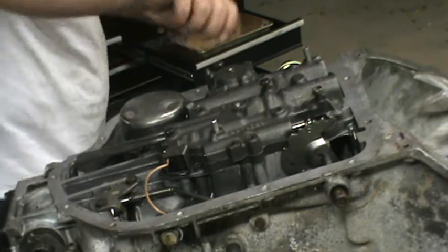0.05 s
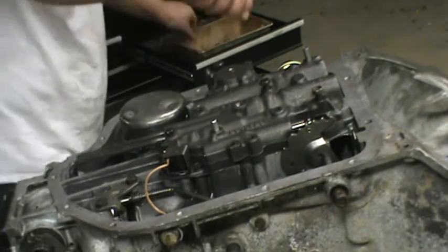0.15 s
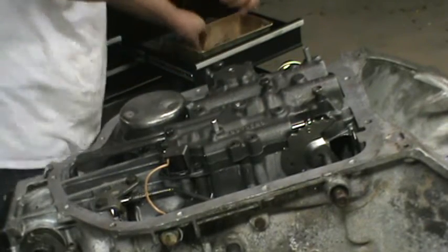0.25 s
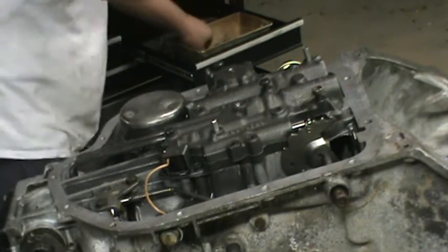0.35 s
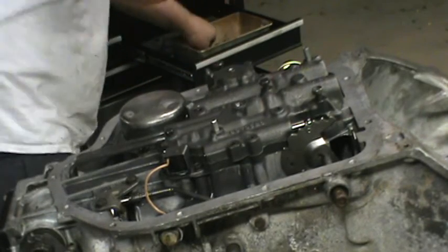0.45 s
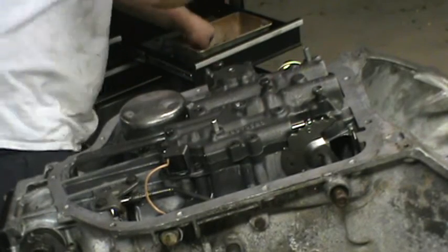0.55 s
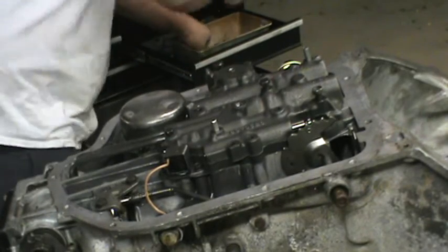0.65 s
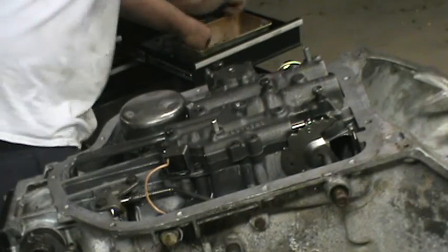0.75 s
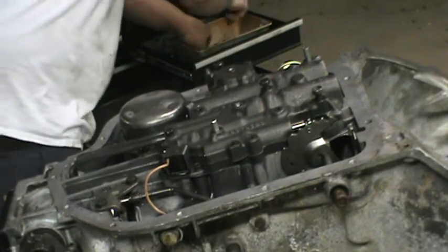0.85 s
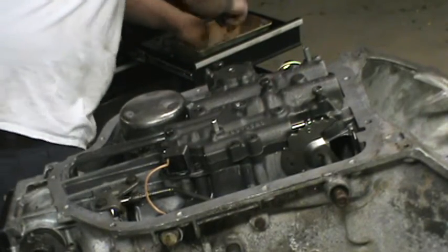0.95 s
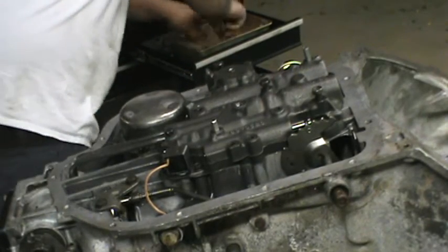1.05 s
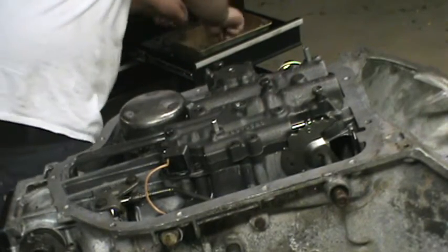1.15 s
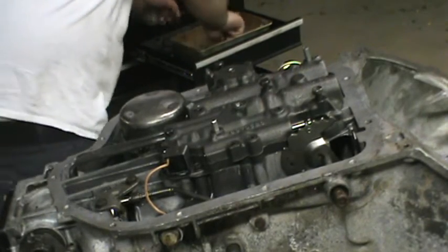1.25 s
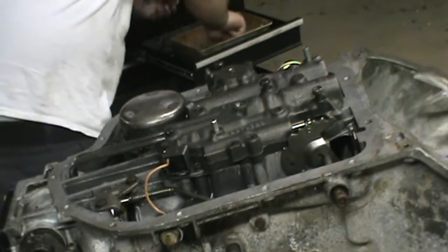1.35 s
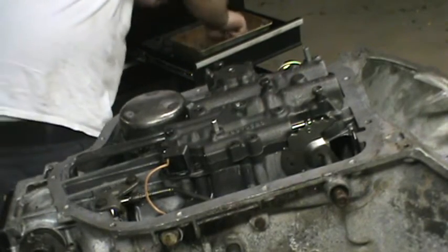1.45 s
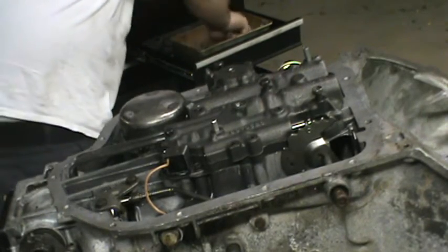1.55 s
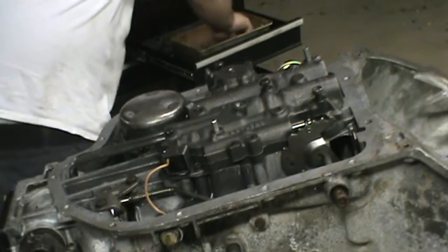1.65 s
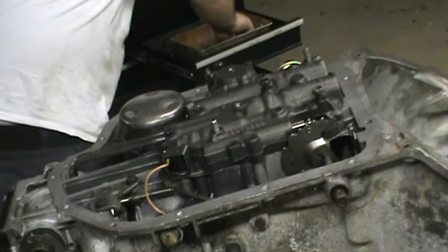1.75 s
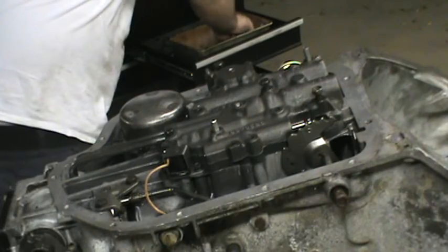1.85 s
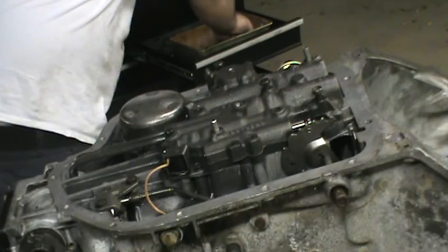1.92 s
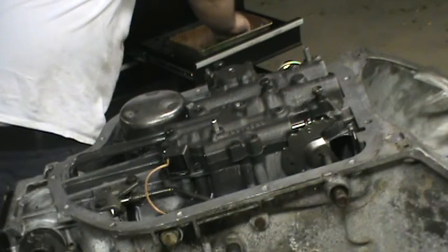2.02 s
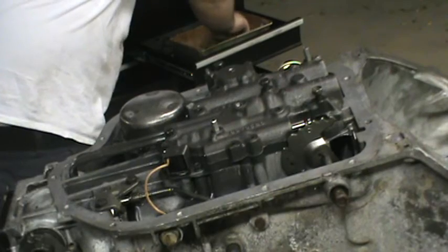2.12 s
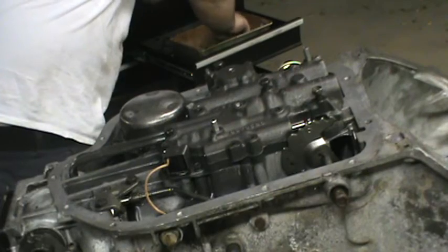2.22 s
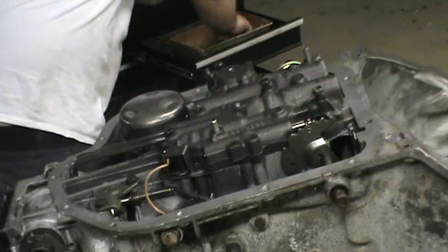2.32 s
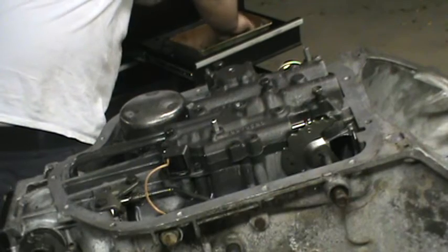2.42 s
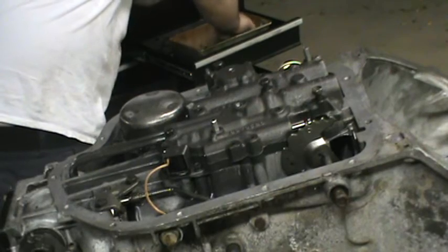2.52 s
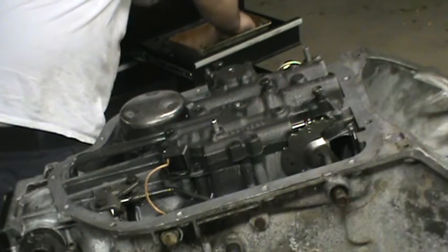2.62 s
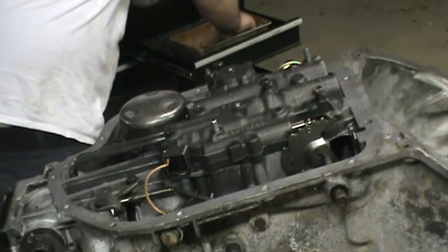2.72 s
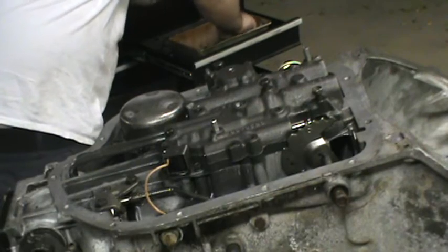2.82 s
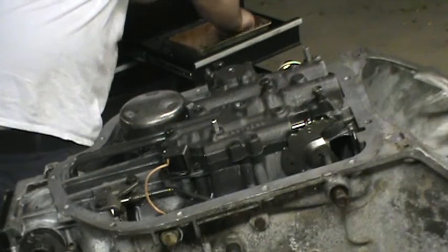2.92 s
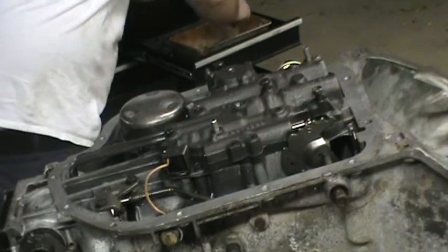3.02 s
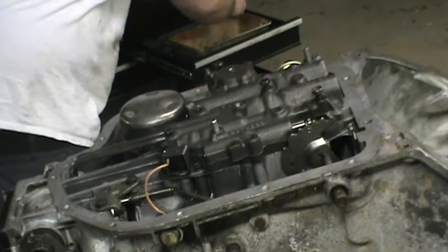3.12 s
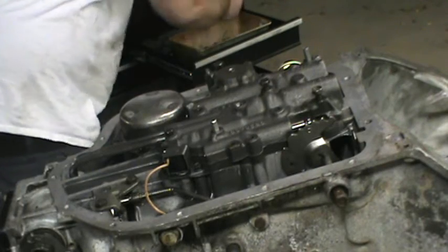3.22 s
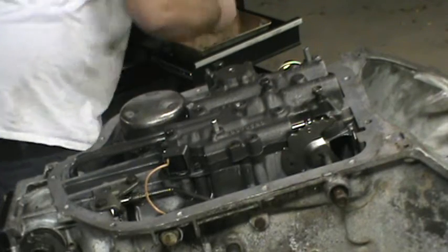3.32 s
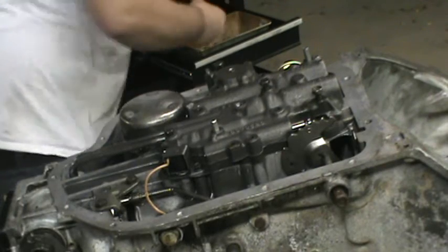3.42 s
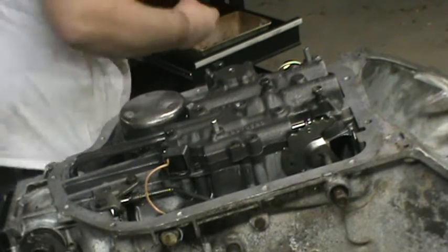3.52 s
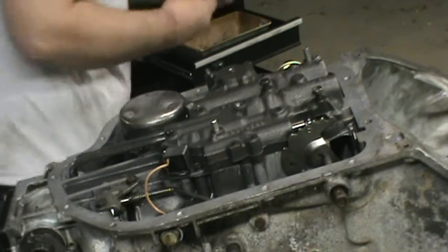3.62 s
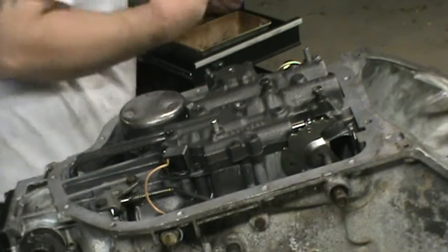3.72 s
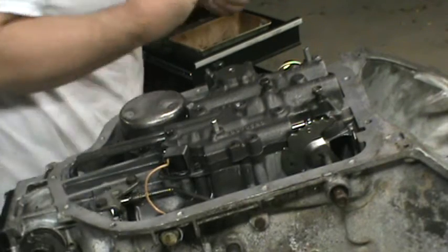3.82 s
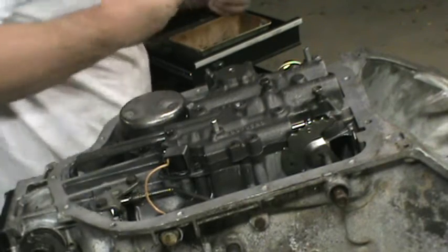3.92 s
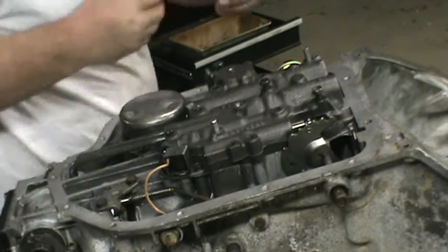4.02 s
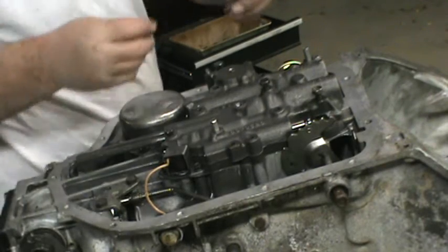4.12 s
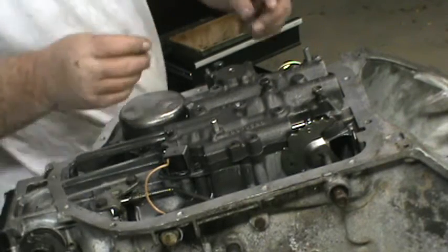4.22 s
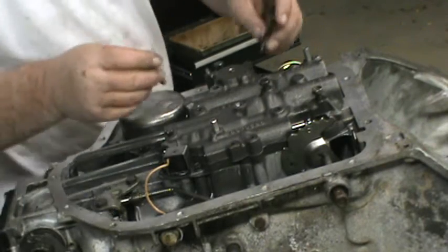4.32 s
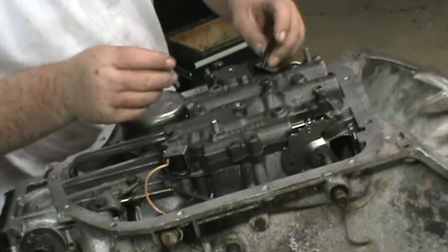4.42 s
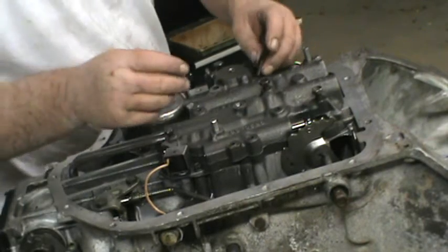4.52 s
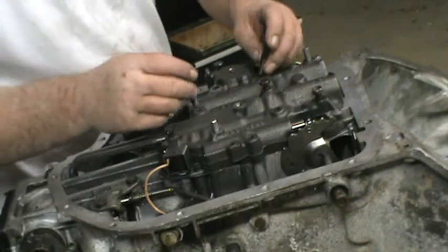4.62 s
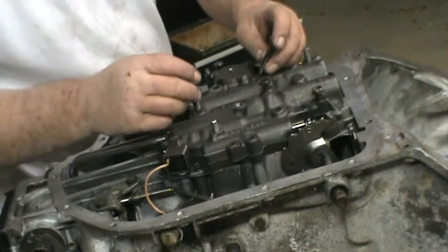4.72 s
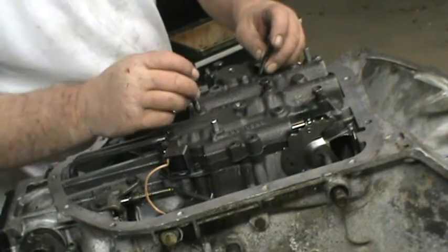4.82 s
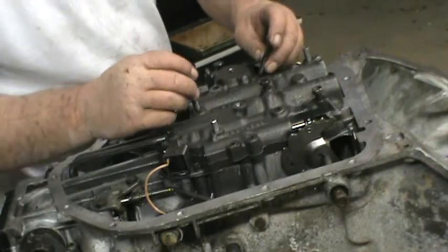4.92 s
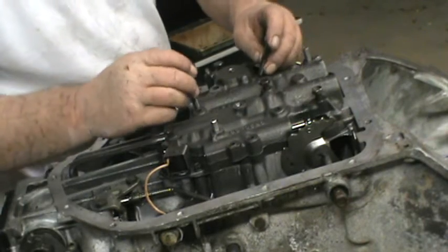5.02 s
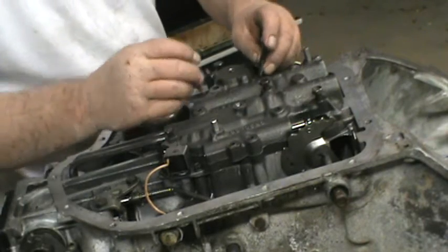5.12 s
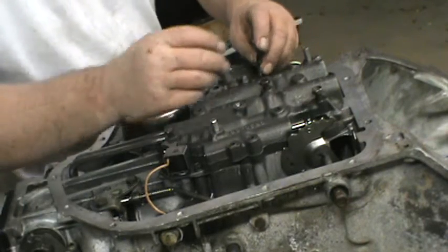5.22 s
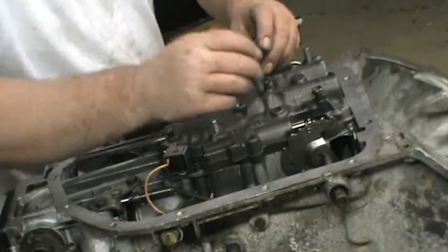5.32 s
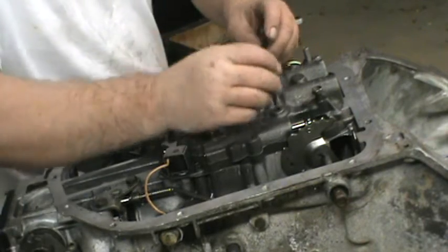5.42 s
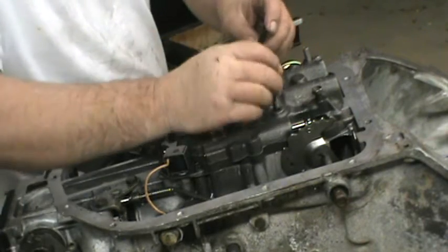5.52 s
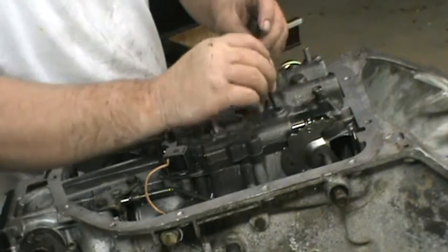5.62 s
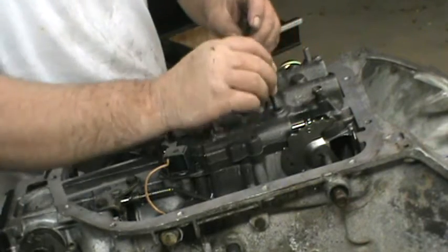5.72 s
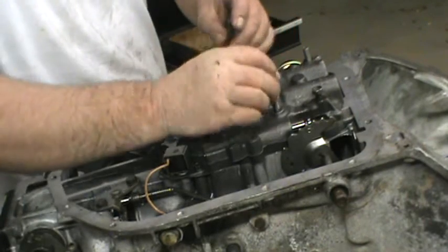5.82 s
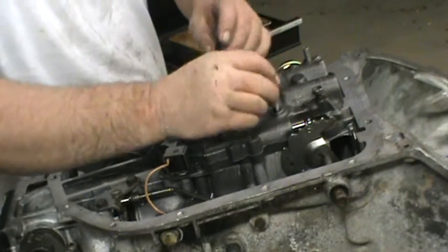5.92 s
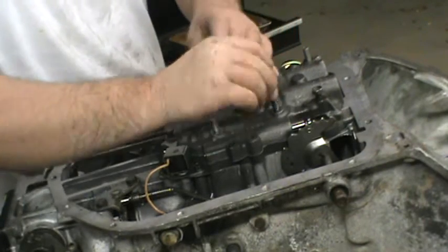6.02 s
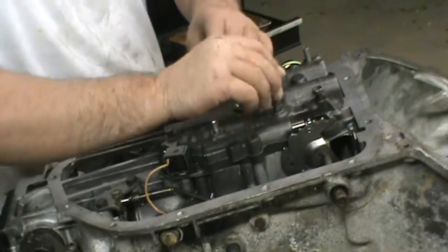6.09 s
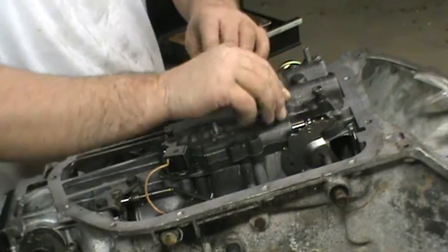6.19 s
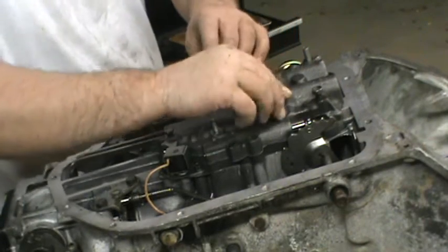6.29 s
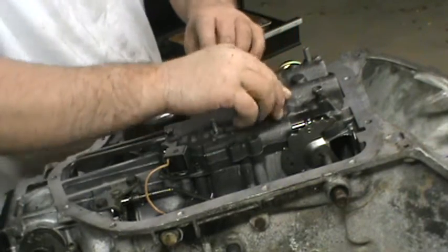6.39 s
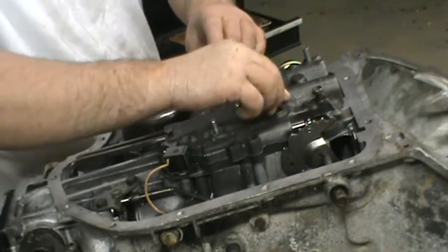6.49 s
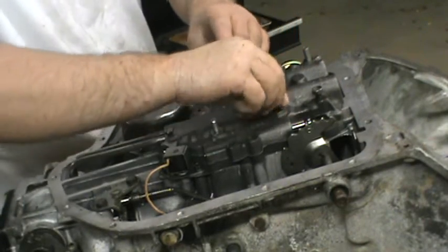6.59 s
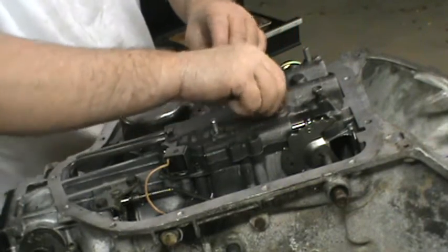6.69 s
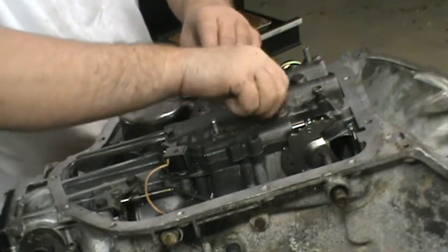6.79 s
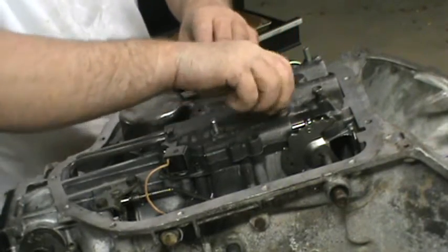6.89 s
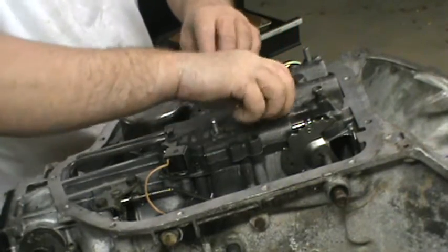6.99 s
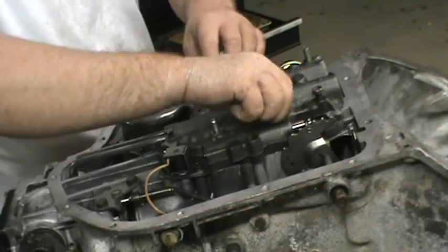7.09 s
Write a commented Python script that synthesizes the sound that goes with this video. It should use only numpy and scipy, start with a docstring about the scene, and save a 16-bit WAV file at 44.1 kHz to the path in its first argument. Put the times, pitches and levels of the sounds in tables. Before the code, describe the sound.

A quiet workshop heard through a small camera microphone, with soft hiss, low room rumble and a very faint high whine. From about 0.3 to 2.8 seconds, steel bolts are rummaged in a shallow metal tray: short gritty slides, hollow knocks and high glassy clinks, with a bright clink at 0.8 and harder blows near 1.4, 2.2 and 2.45. Around 3 seconds it falls nearly silent. Near 3.5 a cart shifts with a dull grumble, faint scuff and low panel hum; a clearer gritty shoe scrape comes at 4.2. Closer, tiny taps and faint thread ticks follow from 4.5 to 5.3, a click at 5.5, a sharp clink at 5.85, then a dense, bright clatter with a short scrape on the casting from 6.05 to 6.3. Smaller rattles follow at 6.7 to 6.9 and just after 7.0, with sparse short echoes.

```python
"""Steel bolts rummaged by hand in a shallow tray on a sheet-metal cart: slips and blows ring damped modes.
Shoes scuff gritty concrete as coloured noise grains, and a cart panel hums as a sine.
Bolts are then dropped into the holes of a cast machine part and turned by hand, nearer than the tray.
The place is a quiet workshop with sparse echoes; the small camera microphone adds hiss and a thin whine."""
import sys
import numpy as np
from scipy import signal
from scipy.fft import rfft, irfft
from scipy.io import wavfile
from scipy.ndimage import uniform_filter1d

SR = 44100
rng = np.random.default_rng(int(sys.argv[2]) if len(sys.argv) > 2 else 0)


def to_wav(sig):
    """Store sig (one row per channel, or 1-D mono) as 16-bit WAV at the path in sys.argv[1].

    Samples outside -1..1 are clipped; the rate is SR.
    """
    pcm = np.clip(np.atleast_2d(sig), -1, 1) * 32767
    pcm = np.round(pcm).astype(np.int16)
    wavfile.write(sys.argv[1], SR, pcm.T)  # frames by channels


N = 315315


def gain_of(db):
    """Decibels to amplitude."""
    return 10 ** (np.asarray(db) / 20)


def evened(x):
    """Scales to rms 1."""
    return x / np.sqrt(np.mean(x ** 2) + 1e-20)


def read(points, hz, axis=1):
    """Reads one column of a table on a log-frequency axis."""
    points = np.array(points)
    return np.interp(np.log(hz + 1), np.log(points[:, 0] + 1), points[:, axis])


def add(mix, s, sound):
    """Mixes a sound in at time s."""
    part = mix[round(s * SR):][:len(sound)]
    part += sound[:len(part)]


def colour(x, points):
    """Gives x a spectrum, rms 1."""
    hz = np.fft.rfftfreq(len(x), 1 / SR)
    return evened(irfft(rfft(x) * gain_of(read(points, hz)), len(x)))


def grains(per_s, spread_db):
    """Random slips, a few of them large."""
    size_db = spread_db * np.minimum(rng.exponential(1, N), 4)
    size = gain_of(size_db) * rng.choice([-1., 1.], N)
    return size * (rng.random(N) < per_s / SR)


def swells(rows, rise_s, t60, axis=2):
    """Amplitude of a table of strokes: each rises 60 dB to its level, holds, and dies away by 60 dB."""
    out = np.zeros(N)
    for row in rows:
        start_s, held_s, level_db = row[0], row[1], row[axis]
        t = np.arange(-rise_s, held_s + t60, 1 / SR)
        away = np.maximum(np.maximum(-t / rise_s, (t - held_s) / t60), 0)
        add(out, max(start_s - rise_s, 0), gain_of(level_db - 60 * away))
    return out


def flutter(count, depth_db, size):
    """Loose contact makes a ring flutter once the blow has passed."""
    touch = evened(uniform_filter1d(rng.standard_normal(count), size=size))
    onset = np.minimum(np.arange(count) / 300, 1)
    return gain_of(depth_db * touch * onset)


def ring(modes, rise_s=0.000097, spot_hz=None, favour_db=0):
    """One blow on a body, peak 1; where it lands favours the modes near spot_hz."""
    t = np.arange(12000) / SR
    hz, db, t60 = np.transpose(modes)[:, :, None]
    luck = rng.standard_normal((len(modes), 2))
    if spot_hz:
        db = db + favour_db * np.exp(-(np.log2(hz / spot_hz) / 0.13) ** 2)
    vary_db, phase = 2.5 * luck[:, :1], 2 * luck[:, 1:]
    sound = gain_of(db + vary_db - 60 * t / t60) * np.sin(2 * np.pi * hz * t + phase)
    sound = sound.sum(0) * (1 - np.exp(-t / rise_s))
    return sound / abs(sound).max()


def rub(slips, modes, damp, wander_db, spot_hz=1, favour_db=0):
    """Slips excite a body under the hand; as the contact wanders, each mode comes and goes."""
    out = np.zeros(N)
    for hz, db, t60 in modes:
        wander = np.interp(np.arange(N), np.arange(0, N, 1500), rng.standard_normal(N // 1500 + 1))
        near_db = favour_db * np.exp(-(np.log2(hz / spot_hz) / 0.81) ** 2)
        level = gain_of(db + near_db + wander_db * wander)
        out += level * signal.oaconvolve(slips, ring([(hz, 0, t60 * damp)]))[:N]
    # hold the local loudness even, so that the strokes alone set the level
    return out / np.sqrt(uniform_filter1d(out ** 2, size=8000) + 1e-12)


# snap of hard metal contact: f/Hz, level/dB per Hz
CRACK_SPECTRUM = [(880, -20.5), (1500, -12.5), (2200, -18), (2870, -4), (3500, -9.5), (5900, -6),
                  (6510, -12.5), (8920, -8), (15800, -22)]


def crack(t60):
    """The broad snap of hard contact, peak 1."""
    t = np.arange(2048) / SR
    sound = colour(rng.standard_normal(2048), CRACK_SPECTRUM) * gain_of(-60 * t / t60)
    return sound / abs(sound).max()


def sizzle(t60):
    """The bright spray of small steel parts jolting together, peak 1."""
    t = np.arange(4096) / SR
    spectrum = [(5000, -37), (7500, -4), (10500, 3), (13000, -9), (15800, -8)]  # f/Hz, level/dB per Hz
    sound = colour(rng.standard_normal(4096), spectrum)
    sound = sound * (gain_of(-60 * t / 0.011) + 0.41 * gain_of(-60 * t / t60))
    return sound / abs(sound).max()


def bolt(hz, t60, splash_db, near_db, splash_t60, flutter_db):
    """Two bending planes and neighbouring bolts beat at close pitches, after a loud quick splash."""
    modes = [(hz, 0, t60),
             (hz * 1.008, near_db, t60),
             (hz * .984, near_db, t60 * 0.5),
             (hz * 0.91, near_db - 13, t60 * 0.41)]
    sound = ring(modes, rise_s=0.00012)
    splash = gain_of(splash_db - 60 * np.arange(len(sound)) / SR / splash_t60)
    sound = sound * (1 + splash) / (1 + splash[0])
    return sound * flutter(count=len(sound), depth_db=flutter_db, size=150)


# microphone hiss with room rumble: f/Hz, level/dB per Hz (shape only)
HISS_SPECTRUM = [(12, -48), (20, -2), (116, -6.5), (234, -11.5), (366, -6.5), (398, -11), (870, -13.5),
                 (1000, -15), (1650, -14.5), (1850, -16.5), (4920, -22), (7070, -23), (15900, -22.5)]
# left-right likeness of the hiss: f/Hz, likeness (-1 to 1)
HISS_LIKENESS = [(60, 1), (180, 0.77), (550, -0.15), (1650, 0.041), (4970, 0.4), (15000, 0.85)]
# thin steady whine: f/Hz, level/dB rms
WHINE_TONES = [(15735, -74.5)]


def camera():
    """Microphone hiss with room rumble, faintly patchy noise, and a steady whine of sines."""
    frames, hz = N // 256 + 5, np.fft.rfftfreq(1024, 1 / SR)
    a, b, c, d, patches = rng.standard_normal((frames, 513, 5)).T
    patches = uniform_filter1d(uniform_filter1d(patches, size=12, axis=0), size=14, axis=1)
    same = read(HISS_LIKENESS, hz)[:, None]
    left, other = a + 1j * b, c + 1j * d
    z = np.array([left, same * left + np.sqrt(1 - same ** 2) * other])
    z *= gain_of(read(HISS_SPECTRUM, hz)[:, None] + 0.75 * evened(patches))
    hiss = signal.istft(z, nperseg=1024, noverlap=768)[1][:, :N]
    out = gain_of(-56.5) * evened(hiss)  # dB rms
    for f, db in WHINE_TONES:
        out = out + np.sqrt(2) * gain_of(db) * np.sin(2 * np.pi * f * np.arange(N) / SR)
    return out


# the cart shifts: t/s, held/s, level/dB
CART_SHIFTS = [(.35, 0.0073, -53.5), (3.35, .08, -67), (3.482, 0.018, -58), (6.3, 0.0066, -56)]


def cart(crunch):
    """The shifting cart grumbles low: crunching grains narrowed to a band around 230 Hz."""
    grumble = colour(crunch, [(110, -45), (175, -1.0), (230, 7.5), (330, -33.5)])  # f/Hz, level/dB per Hz
    return swells(CART_SHIFTS, rise_s=0.35, t60=0.083) * grumble


# bolts sliding over the tray: t/s, held/s, grit level/dB, tray drone level/dB, fine fizz level/dB
TRAY_SLIDES = [(.292, 0.0056, -52, -73, -73), (.344, 0.043, -50, -58, -59), (.424, .03, -44, -45.5, -46),
               (.53, 0.13, -56, -52, -58.5), (.77, 0.022, -54, -61, -62), (.802, 0.011, -48.5, -54, -57),
               (.88, 0.033, -46, -48.5, -47.5), (.924, 0.029, -43.5, -43, -65),
               (1.058, 0.067, -59, -57, -70), (1.236, 0.083, -41, -62, -44),
               (1.368, 0.0024, -38.5, -41, -47), (1.4, 0.086, -44, -44, -47.5),
               (1.52, 0.066, -53, -58, -63), (1.63, 0.031, -44.5, -54, -44.5),
               (1.714, 0.025, -53, -60, -54), (1.79, 0.028, -53.5, -58, -54),
               (1.828, 0.012, -42.5, -46, -59), (1.9, 0.17, -59.5, -60, -63), (2.13, 0.0077, -50, -49, -61),
               (2.182, 0.0028, -39, -36.5, -60), (2.3, 0.16, -50.5, -56.5, -52),
               (2.45, 0.0048, -36, -35.5, -47), (2.52, 0.066, -51, -58, -58),
               (2.636, 0.0031, -58, -57, -51), (2.72, .02, -50, -55, -49), (2.75, 0.031, -42, -49, -46.5),
               (2.822, 0.034, -48, -56, -58), (3.5, 0.098, -78, -55.5, -76)]
# bolts knocking the tray floor: t/s, thump level/dB peak, crack level/dB peak, favoured f/Hz
TRAY_KNOCKS = [(0.265, -44.5, -43, 386), (0.294, -49, -46, 402), (0.337, -40.5, -40.5, 2270),
               (0.416, -40, -50, 764), (0.444, -29.5, -40, 880), (0.578, -41.5, -45, 920),
               (.586, -39, -55, 2280), (0.8, -32, -57, 860), (0.885, -39, -34, 900),
               (0.918, -28, -31.5, 920), (0.964, -36, -55, 1040), (1.055, -36, -58, 920),
               (1.211, -37.5, -58, 880), (1.227, -28, -32, 900), (1.366, -22.5, -18, 1020),
               (1.384, -35, -45, 980), (1.42, -30, -43, 390), (1.45, -33, -31, 660),
               (1.534, -30.5, -43, 820), (1.67, -33, -45, 1350), (1.744, -40, -54, 890),
               (1.78, -39, -44, 1350), (1.822, -34.5, -32.5, 1630), (1.849, -34.5, -54, 965),
               (2.141, -45, -45, 880), (2.175, -21.5, -28, 408), (2.291, -52, -35.5, 896),
               (2.31, -41.5, -48, 846), (2.445, -20, -19.5, 910), (2.48, -31, -43, 1230),
               (2.629, -34, -37.5, 835), (2.705, -45, -46, 860), (2.747, -37, -24, 1600),
               (2.82, -34, -33, 820), (3.156, -62, -44.5, 895)]
# modes of the tray: f/Hz, level/dB, t60/s of a free knock
TRAY_MODES = [(387.5, -4, 0.074), (450, -26.5, 0.024), (506, 4, 0.029), (660, 1, 0.07), (770, -5, 0.045),
              (889, 1.5, 0.066), (960, -4, 0.034), (1067, -0.5, 0.045), (1192, -2.5, 0.041),
              (1317, -2, 0.05), (1588, -1, 0.047), (1826, -5, 0.044), (2247, -3, 0.014), (2290, -13, 0.079)]
# gritty slide of steel on the tray: f/Hz, level/dB per Hz
GRIT_SPECTRUM = [(880, 3.5), (1500, 7.5), (6560, -3), (8290, -3.5), (8540, -13.5), (8970, -9.5),
                 (9230, -21.5), (10200, -16), (15500, -31.5)]


def tray():
    """Slips and knocks drum on the tray; the drone's favoured pitch glides from knock to knock."""
    slips = grains(1800, 4.43)
    grit = colour(slips + 0.6 * rng.standard_normal(N), GRIT_SPECTRUM)
    grit = grit * flutter(count=N, depth_db=2.0, size=250)
    fizz = signal.oaconvolve(grit, signal.firwin(63, 9000, pass_zero=False, fs=SR), "same")
    path = np.array(TRAY_KNOCKS)
    glide_hz = np.interp(np.arange(N) / SR, path[:, 0], path[:, 3])
    drone = rub(slips, TRAY_MODES, damp=0.6, wander_db=9.5, spot_hz=glide_hz, favour_db=9.5)
    out = np.zeros(N)
    for axis, layer in enumerate([evened(grit - fizz), drone, evened(fizz)], start=2):
        out += swells(TRAY_SLIDES, rise_s=0.074, t60=0.23, axis=axis) * layer
    for s, thump_db, crack_db, spot_hz in TRAY_KNOCKS:
        add(out, s, gain_of(thump_db) * ring(TRAY_MODES, 0.0063, spot_hz, favour_db=11.5))
        add(out, s, gain_of(crack_db) * crack(0.046))
    return out


# bolt against bolt: t/s, level/dB peak, ring f/Hz, t60/s, time until damped/s
BOLT_CLINKS = [(0.417, -20.5, 9900, 0.064, .3), (0.42, -32.5, 8990, 0.31, .14),
               (0.626, -37, 8940, 0.33, .2), (.800, -14, 9810, 0.2, 0.11), (0.805, -31, 9420, 0.1, .09),
               (0.88, -30, 9830, 0.26, 0.15), (.935, -41, 9300, 0.53, .2), (1.103, -45, 9500, 0.16, 0.045),
               (1.246, -24.5, 8670, 0.59, 0.08), (1.278, -27, 9740, .3, 0.027),
               (1.32, -34, 8800, 0.089, 0.035), (1.478, -22.5, 9920, 0.058, 0.038),
               (1.529, -24.5, 10250, .03, .05), (1.622, -35, 8700, 0.11, .02),
               (1.637, -20.5, 8750, 0.17, 0.085), (1.711, -47, 8700, 0.22, .07),
               (2.205, -36.5, 8720, 0.23, 0.049), (2.400, -46, 8800, .2, 0.023)]
# small steel parts ticking together, too damped to ring: t/s, level/dB peak
STEEL_TICKS = [(.28, -48), (.295, -51), (1.215, -40), (1.318, -38), (1.619, -31), (1.74, -39), (2.139, -36),
               (2.174, -30), (2.204, -30.5), (2.278, -35), (2.294, -33), (2.35, -42), (2.39, -46),
               (2.442, -32), (2.612, -34), (2.709, -31), (2.747, -26), (2.814, -27.5), (2.823, -30)]


def clinks():
    """Bolts ring freely until a finger or a neighbour damps them; small parts tick without ringing."""
    out = np.zeros(N)
    for s, db, hz, t60, free_s in BOLT_CLINKS:
        sound = bolt(hz, t60, splash_db=5.5, near_db=-20, splash_t60=0.047, flutter_db=1.5)
        damped_s = np.maximum(np.arange(len(sound)) / SR - free_s, 0)
        add(out, s, gain_of(db - 60 * damped_s / .02) * sound)
        add(out, s, gain_of(db - 27) * crack(0.016))
    for s, db in STEEL_TICKS:
        add(out, s, gain_of(db) * sizzle(0.065))
    return out


# soles dragged over gritty concrete: t/s, held/s, scrape level/dB, dull part level/dB, fine dust level/dB
SOLE_SCUFFS = [(3.25, 0.26, -69, -64, -65), (3.5, 0.071, -51.5, -52, -62), (3.74, 0.13, -69, -76, -61.5),
               (4.09, .05, -72, -62.5, -59), (4.21, 0.069, -39, -51, -46)]
# scrape of a sole: f/Hz, level/dB per Hz
SOLE_SPECTRUM = [(530, -36), (900, -5), (1100, -4), (2100, 1.5), (3300, -0.5), (6200, -15.5), (10200, -17),
                 (15500, -23.5)]


def scuffs(crunch):
    """Grit crunches under the soles: a scrape, a dull part and fine dust, each with its own level."""
    dull_spectrum = [(150, -17), (300, -3.0), (420, 4), (600, 0), (1100, -5.5), (2000, -42)]
    dull = colour(crunch[::-1], dull_spectrum)  # reversed, so its grains fall apart from the scrape's
    scrape = colour(crunch, SOLE_SPECTRUM)
    dust = signal.oaconvolve(scrape, signal.firwin(63, 5500, pass_zero=False, fs=SR), "same")
    out = np.zeros(N)
    for axis, layer in enumerate([evened(scrape - dust), dull, evened(dust)], start=2):
        out += swells(SOLE_SCUFFS, rise_s=0.23, t60=0.32, axis=axis) * layer
    return out


# a cart panel hums when it is brushed: t/s, held/s, level/dB rms
PANEL_HUMS = [(3.4, .03, -60), (3.476, .005, -65), (3.545, .05, -51)]


def panel():
    """One smooth mode of thin sheet metal, at 270 Hz."""
    hum = np.sqrt(2) * np.sin(2 * np.pi * 270 * np.arange(N) / SR)
    return swells(PANEL_HUMS, rise_s=0.052, t60=1) * hum


# bolts striking the casting: t/s, crack level/dB peak, casting level/dB peak, favoured f/Hz,
# bolt ring level/dB peak, ring f/Hz, ring t60/s, sizzle level/dB peak
CASTING_TAPS = [(4.5143, -41.5, -37.5, 2900, -42.5, 9030, 0.15, -63),
                (4.522, -50, -45, 1950, -63, 9030, .11, -68),
                (4.6313, -55, -46, 1580, -65, 10200, .025, -57),
                (4.7449, -45, -38, 2800, -41, 8700, 0.073, -54),
                (5.4855, -26, -28, 2850, -27.5, 8730, .1, -55),
                (5.8554, -24, -40, 2680, -17, 8540, 0.06, -32),
                (5.8581, -25.5, -32.5, 1340, -12, 8730, 0.048, -24),
                (5.905, -51, -60, 1230, -28, 8670, 0.29, -55),
                (6.0612, -35, -54, 534, -32, 8830, 0.032, -45),
                (6.0656, -25, -30, 2870, -31, 8320, 0.021, -40),
                (6.071, -16.5, -34, 640, -30.5, 9060, .025, -29),
                (6.0752, -15.5, -28.5, 1220, -21.5, 9420, 0.019, -23),
                (6.135, -13.5, -27, 2850, -11, 10000, 0.022, -19),
                (6.1582, -16, -30, 2860, -14, 8660, 0.13, -23),
                (6.1641, -13.5, -22.5, 2980, -16.5, 8680, 0.09, -28),
                (6.1799, -23, -25, 2860, -26, 8900, 0.098, -19),
                (6.1857, -23, -27.5, 1560, -36, 8710, .025, -27),
                (6.1974, -20, -26.5, 1230, -46, 8820, .025, -34),
                (6.215, -39, -35, 1220, -40, 9400, .025, -36),
                (6.2318, -19.5, -28, 2300, -35, 9600, .025, -20),
                (6.2397, -30, -20, 2600, -46, 8440, .025, -26),
                (6.2786, -31, -30, 3200, -45, 9200, 0.022, -39),
                (6.6736, -26.5, -41, 3220, -32, 8970, 0.14, -39),
                (6.6773, -23, -38, 3030, -21, 8770, .11, -18.5),
                (6.6884, -24.5, -42, 3270, -26, 8960, 0.058, -28),
                (6.6937, -29, -39, 1530, -23, 8940, 0.13, -36),
                (6.787, -30.5, -44, 3250, -47, 8750, .11, -49),
                (6.7921, -33, -50, 1520, -26, 9020, 0.14, -51),
                (6.8019, -32, -41.5, 1210, -49, 8840, 0.087, -46),
                (6.8209, -44, -46, 1550, -51, 9100, .11, -56),
                (6.9141, -31.5, -34, 1420, -36, 8900, 0.1, -32.5),
                (6.9507, -59, -47, 1240, -63, 9000, .11, -54),
                (7.0305, -41, -56, 2640, -22, 8920, 0.1, -24),
                (7.037, -23.5, -36, 3160, -10.5, 8980, 0.047, -26),
                (7.0384, -27, -32, 2710, -35, 9000, .025, -19),
                (7.0438, -26, -30.5, 2040, -42, 9000, 0.023, -35),
                (7.0577, -27, -41, 1900, -29, 8930, .11, -35),
                (7.0617, -33, -49, 1930, -27, 9070, 0.079, -41),
                (7.0786, -43, -40, 2430, -33, 9000, 0.077, -47),
                (7.091, -48, -45, 1230, -44, 9000, .11, -49)]
# modes of the casting: f/Hz, level/dB, t60/s before any damping by the contact
CASTING_MODES = [(623, -1, 0.058), (750, 2.5, 0.018), (1235, 1, 0.056), (1541, -4, 0.14),
                 (1612, -3.5, 0.044), (1815, -11.5, 0.061), (1930, -5.5, 0.13), (2396, -5, 0.069),
                 (2648, 2, 0.045), (2807, 4.5, 0.011), (2885, -6.5, 0.019), (3090, -4, 0.061),
                 (3930, -26, 0.032), (4710, -3, 0.04), (5000, -17, 0.03), (5240, -5.5, 0.056),
                 (5730, -11, 0.046), (7330, -16, 0.032)]


def taps():
    """Bolts strike the cast metal; returns the casting and the bolt rings."""
    out, rings = np.zeros(N), np.zeros(N)
    split_hz = 3500
    low = [mode for mode in CASTING_MODES if mode[0] < split_hz]
    high = [(f, db, t60 * 0.81) for f, db, t60 in CASTING_MODES if f > split_hz]
    for s, crack_db, body_db, spot_hz, ring_db, hz, t60, sizzle_db in CASTING_TAPS:
        add(out, s, gain_of(sizzle_db) * sizzle(0.081))
        add(out, s, gain_of(crack_db) * crack(0.017))
        # a sharp edge wakes the high modes
        edge = ring(high) * flutter(count=12000, depth_db=5, size=100)
        add(out, s, gain_of(crack_db - 10) * edge)
        body = ring(low, 0.0008, spot_hz, favour_db=10) * flutter(count=12000, depth_db=4, size=120)
        add(out, s, gain_of(body_db) * body)
        sound = bolt(hz, t60, splash_db=8, near_db=-2, splash_t60=0.023, flutter_db=3.5)
        add(rings, s, gain_of(ring_db) * sound)
    return out, rings


# a bolt turned in its thread, one row a twist: t/s, held/s, level/dB
THREAD_TWISTS = [(4.642, 0.0073, -69), (4.746, 0.018, -64), (4.954, 0.015, -65), (5.096, .02, -66),
                 (5.22, 0.064, -70)]


def thread():
    """A turning bolt slips in its thread: about 190 ticks a second, each a short ring at 1630 Hz."""
    tick = ring([(1630, 0, 3.8 / 85)], rise_s=.002)
    ticking = evened(signal.oaconvolve(grains(190, 4.4), tick)[:N])
    return swells(THREAD_TWISTS, rise_s=.12, t60=0.15) * ticking


# a handful of bolts dragged over the casting: t/s, held/s, level/dB
CASTING_DRAGS = [(6.072, .005, -44.5), (6.14, 0.038, -45), (6.19, 0.0085, -54), (6.235, 0.0037, -27.5),
                 (6.3, 0.018, -58), (6.63, 0.048, -63), (6.91, .003, -54.5)]
# scrape of the dragged bolts: f/Hz, level/dB per Hz
DRAG_SPECTRUM = [(290, -45), (500, -17.5), (665, -3.5), (1160, -6.5), (2640, -5), (3770, -9.5),
                 (11300, -24), (15000, -32)]


def drag():
    """Dragged bolts slip on the cast metal: a scrape, with the casting's damped modes under it."""
    slips = grains(3000, 2.3)
    body = rub(slips, CASTING_MODES, damp=0.36, wander_db=9.0)
    scrape = colour(slips, DRAG_SPECTRUM)
    return swells(CASTING_DRAGS, rise_s=0.04, t60=0.15) * (gain_of(-10.5) * body + scrape)


# echoes of the workshop: f/Hz, t60/s, left-right likeness (0 to 1)
SHOP_BANDS = [(200, 0.59, 0.84), (600, 0.34, 0.98), (1480, .35, 0.37), (4050, 0.46, 0.23),
              (12800, 0.2, 0.37)]


def shop(x):
    """Sparse echoes of random sign, each band dying at its own speed; the bass is alike in both channels.
    Three sets of echoes take turns, so that no single set colours the ringing modes."""
    out = np.zeros((2, N))
    for k in range(3):
        echoes = np.zeros((2, SR // 2))
        at = np.arange(120, SR // 2 - 20, 20)
        at = at + rng.integers(0, 20, (2, len(at)))
        np.put_along_axis(echoes, at, rng.choice([-1., 1.], at.shape), 1)
        hz, t, z = signal.stft(echoes, SR, nperseg=256)
        same = read(SHOP_BANDS, hz, axis=2)[:, None]
        z = np.array([z[0], same * z[0] + np.sqrt(1 - same ** 2) * z[1]])
        decay = gain_of(-60 * t / read(SHOP_BANDS, hz)[:, None])
        tail = signal.istft(z * decay, SR, nperseg=256)[1]
        # 11 Hz, a third of a cycle apart: together the three keep constant power
        turn = np.sqrt(2 / 3) * np.cos(2 * np.pi * (11 * np.arange(N) / SR + k / 3))
        out += signal.fftconvolve((x * turn)[None], tail / np.linalg.norm(tail[0]), axes=1)[:, :N]
    return out


def scene():
    """The tray and the steps are farther from the microphone and wetter than the casting."""
    crunch = grains(6000, 4.5) + 0.62 * rng.standard_normal(N)
    feet = cart(crunch) + scuffs(crunch)
    far, far_rings = tray(), clinks()
    near, near_rings = taps()
    near = near + thread() + drag()
    no_bass = signal.butter(2, 260, "high", fs=SR, output="sos")
    far, near = signal.sosfilt(no_bass, [far, near])  # the tray and the casting carry little below about 260 Hz
    # left and right gains in dB place each group
    dry = (far + far_rings) * gain_of([[-2.5], [-1.5]])
    dry = dry + feet * gain_of([[-2.3], [-2.1]]) + panel()
    dry += (near + near_rings) * gain_of([[-.6], [.4]])
    wet = far * gain_of(-8.0) + far_rings * gain_of(-7.0) + feet * gain_of(-4.5)
    wet += (near + near_rings) * gain_of(-7.5)
    return dry + shop(wet) + camera()


def record(dry):
    """The band limit of the camera, a steep low-pass at 15950 Hz."""
    return signal.oaconvolve(dry, signal.firwin(511, 15950, window=("kaiser", 9), fs=SR)[None], "same")


dry = scene()
out = record(dry)
to_wav(out)
```